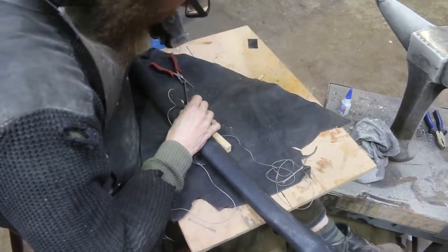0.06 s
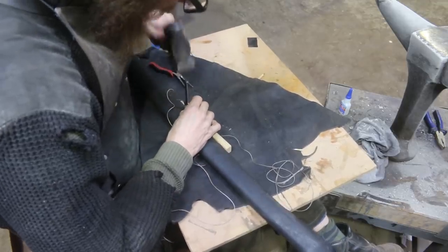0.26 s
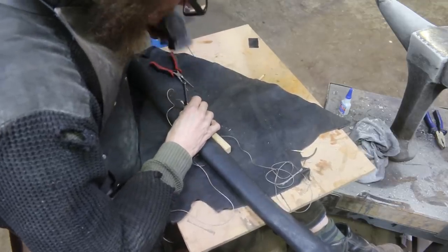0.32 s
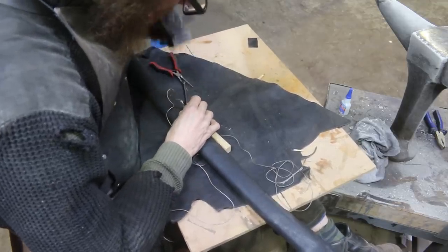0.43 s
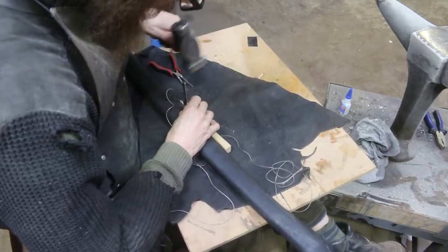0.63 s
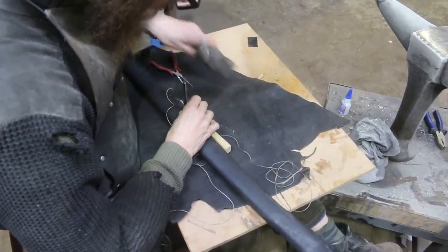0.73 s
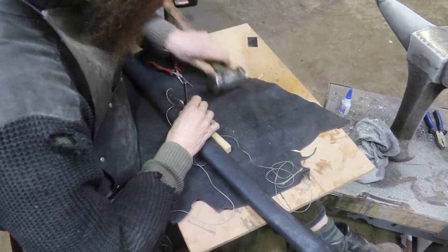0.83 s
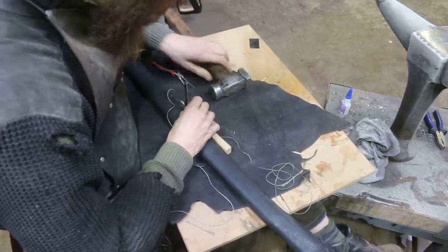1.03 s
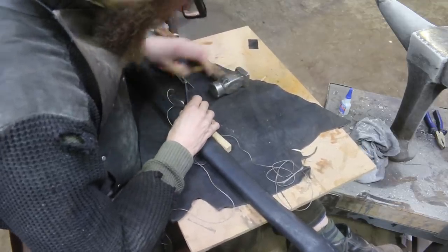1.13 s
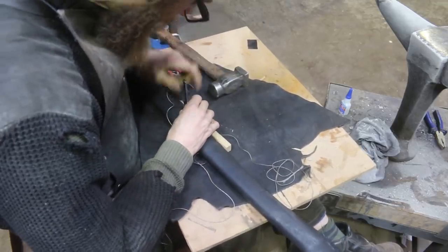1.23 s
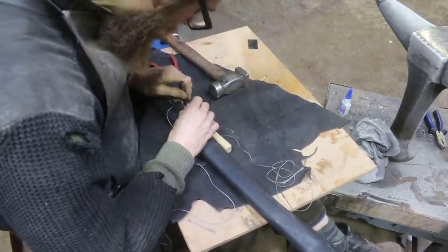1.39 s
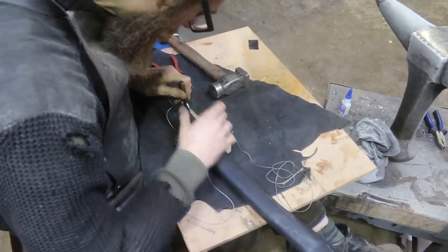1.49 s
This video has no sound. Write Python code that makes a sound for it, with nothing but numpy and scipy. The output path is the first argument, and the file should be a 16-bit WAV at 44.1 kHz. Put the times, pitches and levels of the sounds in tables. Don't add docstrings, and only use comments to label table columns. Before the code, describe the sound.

Hammer taps on a leather scabbard over a plywood bench, heard close in an echoing workshop. A previous tap's echo fades at the start; hard, clipped blows at 0.22 and 0.56 seconds carry steel ring and small bounces, their echo held up by gain control. The hammer lands with low thuds around 0.91-0.98, with faint ticks and rustling, then a tool knocks wood at 1.18 and fades into quiet hush.

```python
import sys
import numpy as np
from scipy import signal
from scipy.fft import rfft, irfft
from scipy.io import wavfile

SR = 44100
rng = np.random.default_rng(int(sys.argv[2]) if len(sys.argv) > 2 else 0)


def inscribe(sig):
    pcm = np.round(np.clip(np.atleast_2d(sig).T, -1, 1) * 32767)
    wavfile.write(sys.argv[1], SR, pcm.astype(np.int16))


def gain_from_decibels(decibels):
    exponent = np.asarray(decibels, float) / 20
    return 10 ** exponent


N = 68355
PRE = SR // 4
RING_WIDTH_HZ = 390
KNOCK_S = 1.1807
EARLIER_S = -0.03

TAP_S = [
    .2201,
    .5573,
]
# direct level in dB, room level in dB, gain duck in dB.
TAPS = [
    (11, -3, 18.66),
    (11, -1, 21.76),
]
# direct level in dB, room level in dB, gain duck in dB.
KNOCK = (2.4, -15, 9.3)


def along(points, hz):
    f, v = np.transpose(points)
    return np.interp(np.log(hz + 1), np.log(f + 1), v)


def add(track, s, x):
    part = track[..., PRE + round(s * SR):][..., :x.shape[-1]]
    part += x[..., :part.shape[-1]]


def hammer_taps(track):
    # frequency in Hz, level in dB, T60 in seconds.
    tap_modes = [(301, -3, 0.024), (518.5, 3, 0.016), (184, -38, 0.11), (1065, -10, 0.0042),
                 (1600, -18, 0.017), (2600, 1, 0.0042), (3900, -3.5, 0.005), (5890, -15, 0.0052),
                 (5407, -10.5, 0.0059), (8000, -3.5, 0.001), (11320, 7, 0.001), (13800, -8, 0.001)]
    tap_starts = [.0009, .0006, .0009, .0007, .0006, .0004, .0005, 0, .0005, .0005, .0006, .0006]
    # frequency in Hz, density in dB per Hz.
    tap_room = [(70, -28), (150, -1), (370, 1.5), (680, -13), (3500, -17.5), (7300, -29.5), (9000, -44.5),
                (13500, -44), (15000, -100.5)]
    # ring in Hz, level over the tail in dB, dullness in dB per octave above 1 kHz.
    steel_head = [(11100, 8.5, -1.5), (12750, 11, 0)]
    for s, (db, room_db, _), (ring_hz, ring_db, dull_db) in zip(TAP_S, TAPS, steel_head):
        def steel(hz):
            peak_db = ring_db * np.exp(-((hz - ring_hz) / RING_WIDTH_HZ) ** 2)
            return gain_from_decibels(peak_db - dull_db * np.log2(1 + hz / 1000))

        add(track, s, gain_from_decibels(db) * ring(tap_modes, tap_starts))
        add(track, s, gain_from_decibels(room_db) * room(tap_room, steel))


def late_knocks(track):
    late_s = [
        .2303,
        .5676,
        .5773,
        .5895,
    ]
    late_db = [-6.5, -6.5, -6, -4.5]
    # frequency in Hz, level in dB, T60 in seconds.
    late_modes = [(380, 0, .014), (620, -5, .009), (1300, -15, .005), (2600, -19, .006),
                  (4600, -25, .008)]
    for s, db in zip(late_s, late_db):
        add(track, s, gain_from_decibels(db - duck_db(np.array([s]))) * ring(late_modes))


def tool_knock(track):
    # frequency in Hz, level in dB, T60 in seconds.
    knock_body = [(368, -1, .06), (730, -3, .03), (450, -5, .035)]
    # frequency in Hz, level in dB, T60 in seconds.
    knock_modes = [(955, -26.5, 0.022), (1500, -6.5, 0.012), (1980, -42, .008), (2860, -5, 0.0026),
                   (3900, -25, 0.0069), (6940, -25, .003), (12000, -33, .003)]
    knock_starts = [.0005, .0005, .0005, .0005, .0004, .0004, .0002, .0003, .0005, .0005]
    # frequency in Hz, density in dB per Hz.
    knock_room = [(41, -52), (70, -7.5), (146, -7), (330, 7.5), (518, -7.5), (887, -6.5), (1810, -12.5),
                  (4000, -28), (12000, -58), (15600, -104), (22000, -120)]
    direct_db, room_db, _ = KNOCK
    add(track, KNOCK_S, gain_from_decibels(direct_db) * ring([*knock_body, *knock_modes], knock_starts))
    add(track, KNOCK_S, gain_from_decibels(room_db) * room(knock_room))


def thuds(track):
    thud_s = [
        .9118,
        .9469,
        .9516,
        .9838,
    ]
    # level in dB, pitch in Hz, room level in dB.
    thud_rows = [(-2.5, 263, -22), (-9.5, 296, -29), (-12, 190, -27), (-19.5, 272, -42.5)]
    # frequency in Hz, density in dB per Hz.
    thud_room = [(60, -54), (110, -2), (170, 4.5), (350, -1.5), (600, -23.5), (1200, -26), (3000, -39.5),
                 (8000, -51.5)]
    # frequency in Hz, level in dB, T60 in seconds.
    bench_boom = [(162, -9.5, .09), (115, -19.5, 0.073)]
    rise_s = 0.0027
    t = np.arange(SR // 20) / SR
    push = (t / rise_s * np.exp(1 - t / rise_s)) ** 2
    for s, (db, hz, room_db) in zip(thud_s, thud_rows):
        add(track, s, gain_from_decibels(db) * push * np.sin(2 * np.pi * hz * t))
        add(track, s + rise_s / 2, -gain_from_decibels(db) * ring(bench_boom))
        add(track, s, gain_from_decibels(room_db) * room(thud_room))


def ticks(track):
    # start in seconds, level in dB, frequency in Hz, T60 in seconds.
    tick_rows = [(.8988, -40.5, 2400, .015), (0.8977, -44, 1500, .015), (.9337, -43.5, 2180, 0.025),
                 (0.9486, -44, 2600, 0.0085), (1.105, -51, 2170, 0.089), (1.1567, -48, 2600, 0.014),
                 (1.1575, -50, 1600, .012), (1.1572, -54, 3900, 0.013)]
    for s, db, hz, t60 in tick_rows:
        add(track, s, ring([(hz, db, t60), (hz * 1.3, db, t60)]))


def rustle(track):
    # centre in seconds, half length in seconds, level in dB, centre frequency in Hz.
    rustle_rows = [(0.905, 0.0046, -32.5, 1200), (0.946, .012, -52, 4000), (1.047, 0.021, -63, 10000),
                   (1.096, 0.034, -59.5, 8000), (1.106, 0.039, -56, 3060), (1.125, 0.077, -55.5, 900),
                   (1.475, 0.023, -61.5, 9000)]
    count = track.shape[1]
    t = np.arange(count) - PRE
    for s, half, db, centre_hz in rustle_rows:
        def rub_gain(hz, u):
            band = np.exp(-np.log((hz + 1) / centre_hz) ** 2 / 0.27)
            return band * (hz < 15800) + 0 * u

        swell = np.exp(-((t / SR - s) / half) ** 2)
        track += gain_from_decibels(db) * cloud(count, rub_gain) * swell


def ring(modes, starts=None):
    # frequency in Hz, lean in dB re 1 radian.
    phase_lean = [(300, -29.5), (2000, -12.5), (5000, -11), (12000, -5)]
    rise_cycles = 0.19
    if starts is None:
        starts = [0] * len(modes)
    out = np.zeros((2, SR // 10))
    for (hz, db, t60), start in zip(modes, starts):
        t = np.clip(np.arange(SR // 10) / SR - start, 0, 1)
        lean = gain_from_decibels(along(phase_lean, hz)) * rng.choice([-1, 1]) * np.array([[1], [-1]])
        rise = 1 - np.exp(-t * hz / rise_cycles)
        decay = gain_from_decibels(db + rng.normal(0, 0.88) - 60 * t / t60)
        out += decay * np.sin(2 * np.pi * hz * t + lean) * rise
    return out


def room(spectrum, extra=lambda hz: 1):
    # frequency in Hz, T60 in seconds.
    echo_t60 = [(100, 0.93), (300, 0.54), (1000, 0.58), (3000, 0.5), (8000, 0.38), (15000, 0.29)]
    # frequency in Hz, width in Hz, level in dB.
    standing_waves = [(92, 3.3, 1), (158.7, 11, 4), (221.4, 16, -1), (259.3, 4, 0), (304, 8.1, 2),
                      (361.4, 8.5, 6.5), (403, 12, 1), (464.5, 4, 2), (472, 4.8, 4.5), (613, 12, 3),
                      (625.5, 9.9, 8.5), (740, 22, 2)]
    rise_s = 0.003

    def decay(hz, t):
        return gain_from_decibels(along(spectrum, hz) - 60 * t / along(echo_t60, hz)) * extra(hz)

    tail = cloud(SR, decay)
    f = np.fft.rfftfreq(2 * SR, 1 / SR)
    waves = gain_from_decibels(sum(db * np.exp(-((f - hz) / width) ** 2) for hz, width, db in standing_waves))
    tail = irfft(rfft(tail, 2 * SR) * waves)[:, :SR]
    return tail * (1 - np.exp(-(np.arange(SR) / SR / rise_s) ** 2))


def earlier_echo(track):
    # frequency in Hz, density in dB per Hz.
    earlier_room = [(41, -58), (70, -22), (145, -7), (171, -5), (309, -0.5), (502, -6.5), (545, -30.5),
                    (1390, -18.5), (9000, -47.5), (11700, -104), (19800, -120)]
    # frequency in Hz, level over the tail in dB.
    ring_hz, ring_db = (4830, 9.1)

    def steel(hz):
        return gain_from_decibels(ring_db * np.exp(-((hz - ring_hz) / RING_WIDTH_HZ) ** 2))

    add(track, EARLIER_S, gain_from_decibels(-21) * room(earlier_room, steel))


def cloud(count, gain):
    # frequency in Hz, likeness from 0 (wide) to 1 (centred).
    likeness = [(60, 1.0), (150, 1.0), (380, 0.98), (950, 0.87), (2380, 0.53), (5980, -0.23),
                (15000, -2.06)]
    hz, t, z = signal.stft(rng.standard_normal((2, count)), SR, nperseg=512, noverlap=384)
    g = gain(hz[:, None], t)
    turn = np.arccos(np.clip(along(likeness, hz), 0, 1))[:, None] / 2
    shaped = z * g * [np.cos(turn), np.sin(turn)]
    mid, side = signal.istft(shaped, SR, nperseg=512, noverlap=384)[1][:, :count]
    return np.array([mid + side, mid - side]) / np.sqrt(np.mean(g[:, 0] ** 2))


def quiet_floor(count):
    # frequency in Hz, level in dB.
    floor_curve = [(25, -9), (70, -8), (125, -4), (220, 10.5), (320, 9), (600, -18), (3000, -20),
                   (15700, -29.5), (16100, -70)]
    return gain_from_decibels(-47) * cloud(count, lambda hz, t: gain_from_decibels(along(floor_curve, hz)) + 0 * t)


def duck_db(t):
    wait_s, drop_s, recover_db_per_s = 0.0018, 0.0009, 109.5
    starts = [*TAP_S, KNOCK_S, EARLIER_S]
    drops = [row[-1] for row in [*TAPS, KNOCK]] + [9.5]
    gains = []
    for s, drop_db in zip(starts, drops):
        after = np.clip(t - s - wait_s, 0, None)
        fall = drop_db * (1 - np.exp(-after / drop_s))
        gains.append(np.minimum(0, recover_db_per_s * after - fall))
    return np.min(gains, axis=0)


def scene():
    track = np.zeros((2, N + PRE))
    for source in (hammer_taps, late_knocks, tool_knock, thuds, ticks, rustle, earlier_echo):
        source(track)
    return (track + quiet_floor(N + PRE))[:, PRE:]


def band_limit(x):
    return signal.sosfilt(signal.butter(12, 16950, fs=SR, output="sos"), x)


def record(dry):
    low_cut = signal.butter(2, 110, "high", fs=SR, output="sos")
    x = signal.sosfilt(low_cut, dry) * gain_from_decibels(duck_db(np.arange(N) / SR))
    top, hardness = 1.03, 14
    mix = x / (1 + np.abs(x / top) ** hardness) ** (1 / hardness)
    return band_limit(mix)


dry = scene()
out = record(dry)
inscribe(out)
```